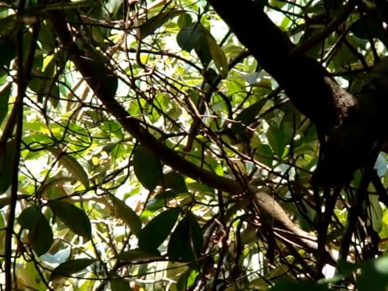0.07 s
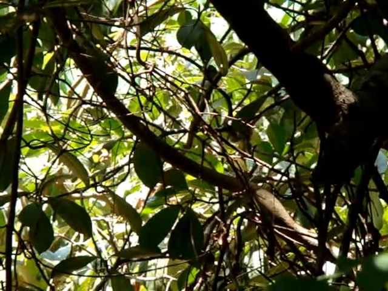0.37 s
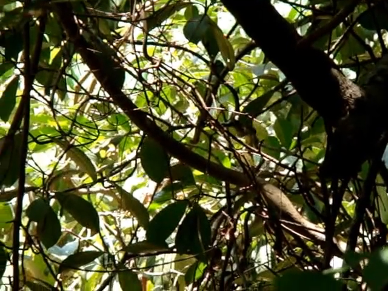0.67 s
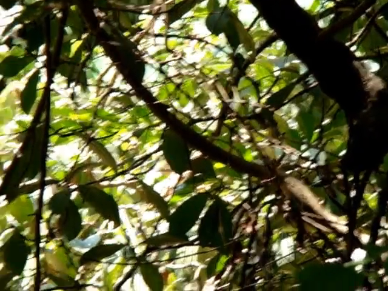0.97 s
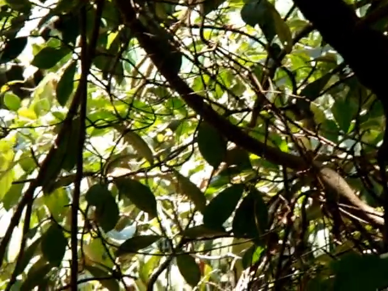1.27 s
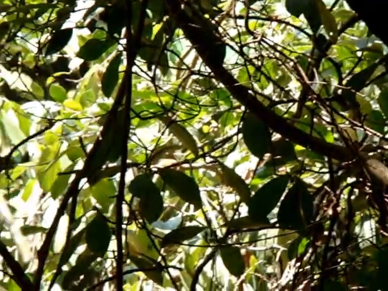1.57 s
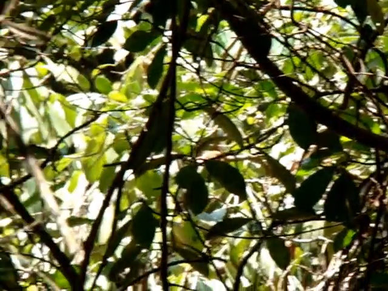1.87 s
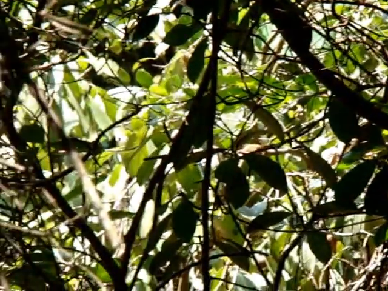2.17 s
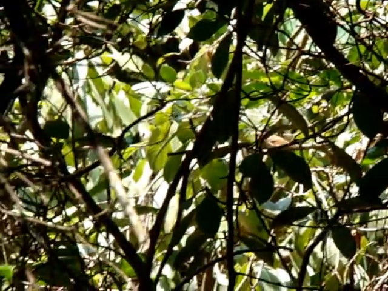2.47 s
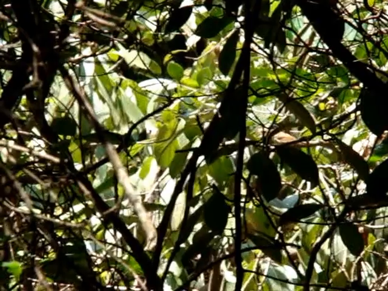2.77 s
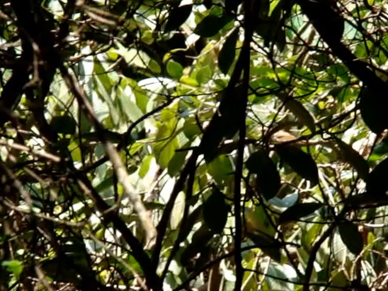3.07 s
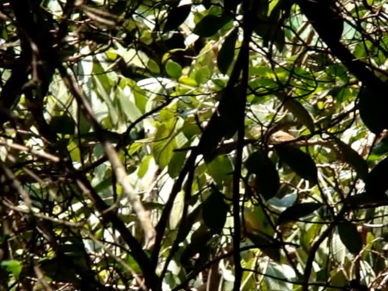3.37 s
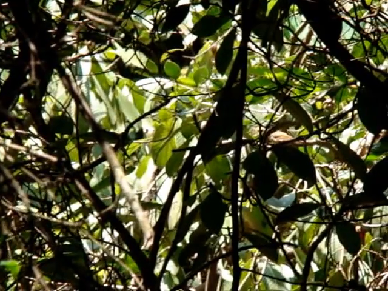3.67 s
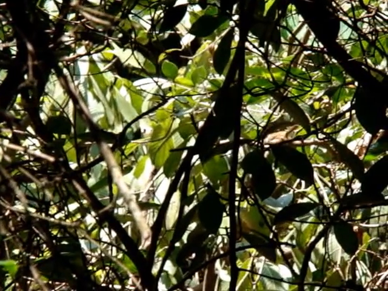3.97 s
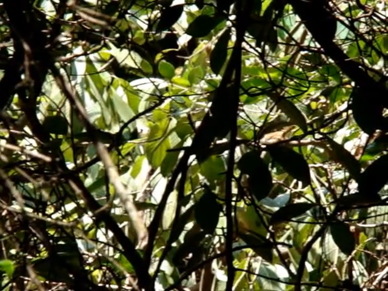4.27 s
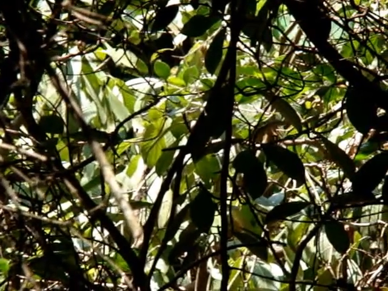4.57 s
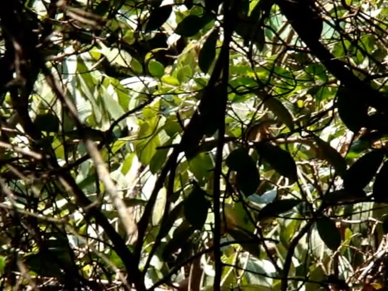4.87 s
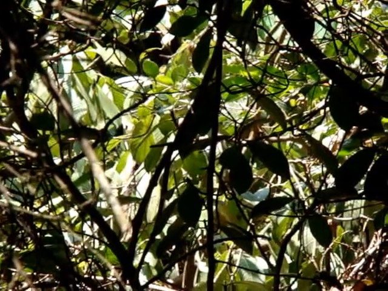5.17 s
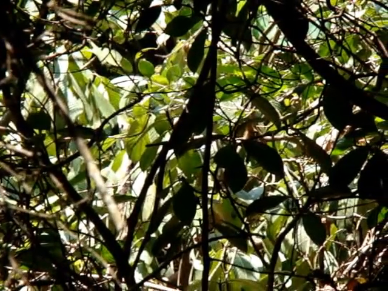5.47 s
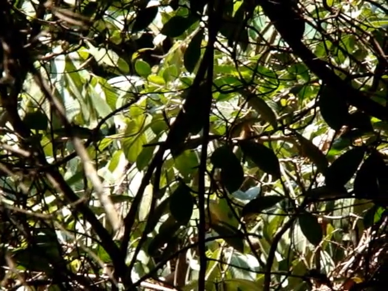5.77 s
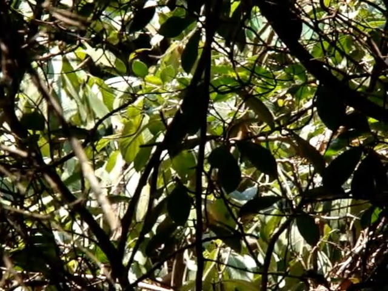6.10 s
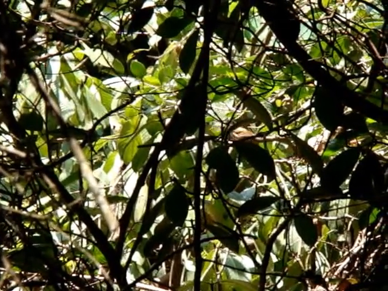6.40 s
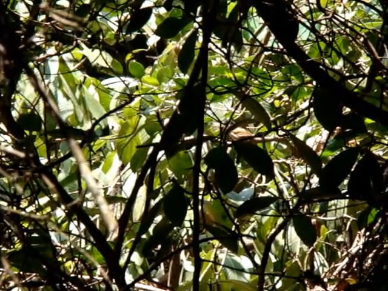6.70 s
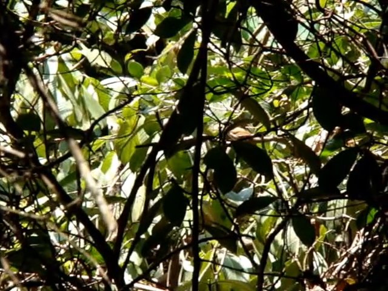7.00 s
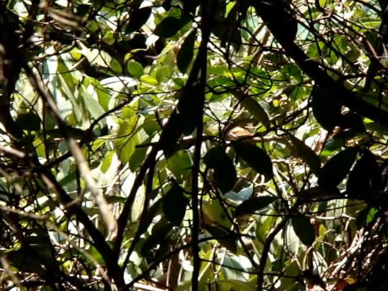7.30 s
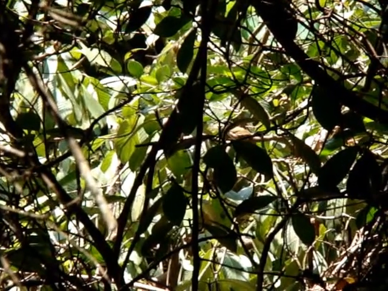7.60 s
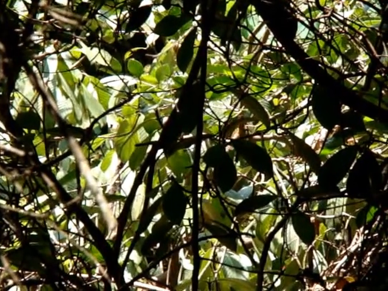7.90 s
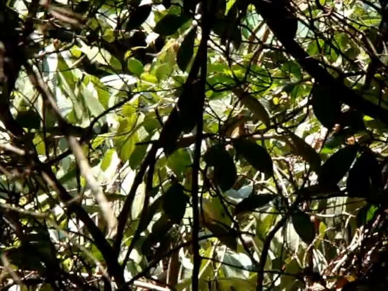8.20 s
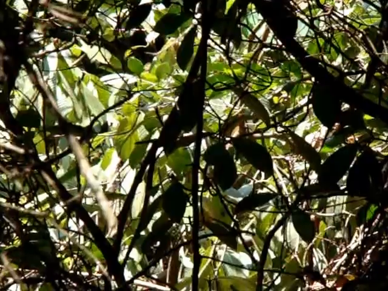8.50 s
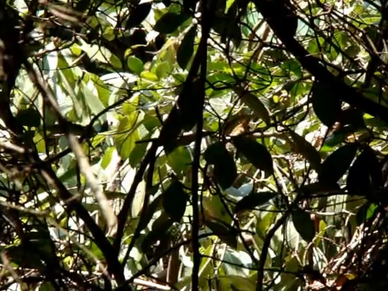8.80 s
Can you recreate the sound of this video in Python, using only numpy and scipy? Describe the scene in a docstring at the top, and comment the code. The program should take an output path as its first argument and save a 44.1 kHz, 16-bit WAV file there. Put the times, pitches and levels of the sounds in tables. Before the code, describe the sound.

A soft, low forest hush and a fine canopy hiss run for about nine seconds. A hidden bird, the loudest sound, calls three times, at about 1.1, 3.6 and 6.9 seconds. Each call has two very short, high notes a third of a second apart: a husky falling whistle, then a buzzy falling rasp. Both end in a tiny chuck and echo among the trunks for nearly a second. A distant cicada drones from the start, fading until it stops around 4.5 seconds. A thin, shrill insect whine comes and goes, roughly a second on and a second off. At about 7 seconds a nearer cicada starts a dense, high hiss, easing slightly near 8 seconds and continuing to the end. Faint leaf rustles, small twig snaps and light wooden ticks are scattered throughout, with a clearer tap and snap around 3 seconds.

```python
"""A babbler hidden in dense woodland calls three times: a husky falling whistle, then a buzzy falling
rasp, both roughened by its fluttering syrinx and closed by a short chuck. Foliage scatters each note
and the trunks hold a long echo. A far cicada drones and fades, a thin insect whines on and off, and a
near cicada's tymbals start up at the third call. Leaves rustle, twigs snap and wood ticks and knocks
over a bed of low forest hush and canopy hiss."""
import sys
import numpy as np
from scipy import signal
from scipy.fft import rfft, irfft, next_fast_len
from scipy.io import wavfile
from scipy.ndimage import uniform_filter1d, map_coordinates

SR = 44100
rng = np.random.default_rng(int(sys.argv[2]) if len(sys.argv) > 2 else 0)


def put_to_file(sound):
    """Save the sound as 16-bit audio at rate SR, in the file named by the first command-line argument."""
    columns = np.atleast_2d(sound).T  # one column per channel
    safe = np.clip(columns, -1, 1)
    whole_steps = np.round(safe * 32767)
    wavfile.write(sys.argv[1], SR, whole_steps.astype(np.int16))


N = 390285

# Tone of the low forest hush. Each row: frequency in Hz, relative level in dB.
HUSH_EQ = [(15, -58), (25, -25), (91, -21.5), (171, -12.5), (300, -5.5), (380, -4.5), (485, -4.5),
           (679, -4), (741, -5.5), (885, -1.5), (1240, -1.1), (1350, -2.5), (1460, -1), (1560, -7.5),
           (1750, -9), (2300, -30)]
# Fader ride on the hush. Each row: time in seconds, level in dB.
HUSH_RIDE = [(0, -53.5), (1.2, -52.5), (2.5, -52.5), (3.4, -53), (4.1, -52.5), (5.1, -52), (6.4, -53.5),
             (7.3, -53), (8.85, -52.5)]
# Tone of the canopy's leaves and far insects. Each row: frequency in Hz, relative level in dB.
CANOPY_EQ = [(1300, -35.5), (1600, -14.5), (1900, -4), (2400, -0.5), (3400, -0.5), (4800, 0.7), (5700, 2),
             (6100, 0.5), (6350, 6), (6600, 0), (7200, 0.5), (7700, -6), (8600, -5.5), (10200, -9)]
# Fader ride on the canopy. Each row: time in seconds, level in dB.
CANOPY_RIDE = [(0, -47.5), (2.5, -47.5), (4, -47.2), (4.9, -47.5), (5.6, -47), (6.4, -48), (8.85, -46.5)]
# Swells on top of a faint, distant hum. Each row: start in seconds, end in seconds, level in dB.
HUM_RISES = [(1.1, 2.5, -72.5), (4.6, 5.9, -70), (6.554, 7.146, -67)]
# Body of the far cicada. Each row: frequency in Hz, relative level in dB.
FAR_CICADA_EQ = [(4500, -38), (5300, -13.5), (5700, -3), (6000, -2), (6400, -5), (7000, 4), (7350, 0.5),
                 (7700, -11.5), (8300, -30)]
# Bouts of the whining insect. Each row: start and end in seconds, gain in dB, fade in seconds.
WHINE_BOUTS = [(-.2, 1.047, -56, .1), (2.05, 3.252, -56, 0.17), (4.22, 5.363, -54.5, 0.1),
               (6.68, 7.704, -49.5, 0.61)]
# The whine's shrill band. Each row: frequency in Hz, relative level in dB.
WHINE_EQ = [(5500, -38), (6150, -4), (6330, -5), (6500, -21), (6670, 7.5), (6840, 1.5), (6950, -12),
            (7150, -16), (7700, -37)]
# Leaf rustles. Each row: start in seconds, gain in dB, length in seconds, leaf resonance in Hz.
LEAF_RUSTLES = [(0.282, -48, 0.017, 3420), (0.418, -49, 0.02, 3000), (0.645, -54, 0.071, 2400),
                (1.32, -57, 0.021, 4200), (2.03, -51.5, 0.05, 3000), (2.199, -52, 0.046, 3400),
                (2.298, -51.5, 0.051, 2280), (2.892, -56.5, 0.052, 3000), (4.39, -59, 0.055, 3900),
                (4.758, -56, 0.038, 3400), (4.85, -59, .06, 3900), (5.343, -57, 0.052, 2600),
                (5.667, -53, 0.024, 2100), (7.772, -53, 0.06, 2240), (7.865, -51, 0.033, 2360),
                (8.24, -53.5, 0.045, 2300)]
# Tone of the echo off the trunks. Each row: frequency in Hz, gain in dB.
TRUNK_EQ = [(200, -6), (2600, -7), (3050, -2), (3450, 1.5), (3700, -3), (4100, 1), (5000, 0), (11000, 1.5)]
# Small twigs breaking. Each row: start in seconds, relative level in dB, pitch in Hz.
TWIG_SNAPS = [(.285, -39, 3400), (1.327, -35, 4500), (2.113, -33, 3080), (2.333, -40, 3800),
              (2.438, -34.5, 2660), (2.895, -35, 3470), (3.059, -32, 4900), (4.39, -37, 3800),
              (4.744, -39, 3450), (5.978, -37.5, 3000), (6.152, -33.5, 2320), (6.625, -37, 2310)]
# Dry ticks and soft knocks of wood. Each row: start in seconds, relative level in dB, pitch in Hz.
WOOD_TAPS = [(1.074, -52, 404), (1.253, -41.5, 1065), (1.278, -44, 1100), (1.332, -45, 745),
             (1.8, -44, 1110), (1.832, -47, 706), (2.246, -53, 363), (2.335, -45, 765), (2.607, -44.5, 960),
             (2.655, -42, 1060), (3.043, -32.5, 1270), (3.085, -50.5, 410), (4.016, -41.5, 1090),
             (4.839, -41.5, 1210), (5.247, -41, 1090), (5.386, -43, 1180), (5.752, -52, 353),
             (6.012, -48, 480), (6.294, -40, 1290), (6.345, -47, 1190), (6.942, -39, 1340),
             (7.030, -50, 358), (8.117, -38, 1400), (8.546, -44.5, 1000), (8.795, -42, 1200)]
# Each call's first note. Each row: start and length in seconds, pitch before the release in Hz,
# easing of the slide from 0 to 1, peak gain in dB, attack in seconds, sag after the peak in dB,
# chuck gain in dB, echo send in dB.
WHISTLE_NOTES = [(1.123, 0.085, 3134, 0.06, -27.5, 0.077, 6, -38.5, -3),
                 (3.574, 0.072, 3096, 0.13, -29, 0.045, 3.5, -36.5, -2),
                 (6.911, .082, 3217, .7, -31, 0.034, 4.5, -49, -0.5)]
# Each call's second note. Each row: start and length in seconds, opening pitch and pitch before the
# release in Hz, rasp gain in dB, attack in seconds, slur gain in dB, slur buzz from 0 to 1,
# chuck gain in dB, pitch that lingers in the echo in Hz, gain of that ring in dB.
RASP_NOTES = [(1.428, 0.11, 4440, 3676, -31.5, 0.029, -28.5, 0.43, -39.5, 3900, -5),
              (3.907, .097, 4410, 3790, -29.5, 0.05, -27, .55, -38.5, 4100, 1),
              (7.23, .124, 4560, 3790, -30.5, .028, -30, 0.32, -46.5, 3790, 0.5)]
# The bird's throat and open beak. Each row: frequency in Hz, gain in dB.
BEAK_EQ = [(1500, -8), (2700, -6.5), (3300, -1), (4050, -2), (4450, -6.5), (4800, -7), (5400, -3.5),
           (7000, 1.5), (10000, 5)]
# Body of the near cicada. Each row: frequency in Hz, relative level in dB.
NEAR_CICADA_EQ = [(3000, -36), (3800, -9), (4000, -4.5), (4500, -2.5), (4750, -6), (5500, -3.5),
                  (6300, -1.5), (6850, 0), (7350, -1.5), (7700, -9), (8500, -14.5), (9200, -10),
                  (10200, -20)]

RELEASE_DROP = 0.1014  # share of its pitch that a note loses as it closes


def amp(db):
    """Decibels to gain."""
    return 10 ** (np.asarray(db) / 20)


def unit(x):
    """Scale to rms 1."""
    return x / np.sqrt(np.mean(x ** 2) + 1e-20)


def clock():
    """The time of each sample in seconds."""
    return np.arange(N) / SR


def ride(rows):
    """A fader move through (seconds, dB) points, in dB per sample."""
    return np.interp(clock(), *np.transpose(rows))


def ramp(start, length):
    """0 before start, rising evenly to 1 over length."""
    return np.clip((clock() - start) / length, 0, 1)


def gate(start, end, fade):
    """Open between start and end, with sloping edges."""
    return np.clip(np.minimum(clock() - start, end - clock()) / fade + .5, 0, 1)


def wobble(rate):
    """A smooth random modulator at rms 1, with rate knots a second."""
    knots = rng.standard_normal(int(N * rate / SR) + 4)
    return unit(map_coordinates(knots, [clock() * rate]))


def filtered(x, response):
    """Filter x by a gain that is a function of frequency."""
    size = next_fast_len(N + 8192)
    return irfft(rfft(x, size) * response(np.fft.rfftfreq(size, 1 / SR)), size)[..., :N]


def eq(x, curve):
    """Run x through a (Hz, dB) curve, cutting everything beyond its ends."""
    points_hz, db = np.transpose(curve)
    return filtered(x, lambda hz: amp(np.interp(np.log(hz + 1), np.log(points_hz), db, -120, -120)))


def coloured(x, curve):
    """EQ x and bring it to rms 1."""
    return unit(eq(x, curve))


def patchy_noise(depth_db):
    """White noise whose level varies in small patches of time and frequency."""
    bins = signal.stft(rng.standard_normal(N), nperseg=512)[2]
    patches = uniform_filter1d(rng.standard_normal(bins.shape), size=5, axis=0)
    patches = uniform_filter1d(patches, size=9, axis=1)
    return signal.istft(bins * amp(depth_db * unit(patches)), nperseg=512)[1][:N]


def narrow_band(hz, width_hz):
    """A tone of wandering strength and phase: a narrow band of noise at rms 1."""
    phase = 2 * np.pi * np.cumsum(hz * np.ones(N)) / SR
    return unit(wobble(width_hz) * np.sin(phase) + wobble(width_hz) * np.cos(phase))


def resonate(x, hz, width_hz):
    """Ring a single resonance with x."""
    return signal.lfilter(*signal.iirpeak(hz, hz / width_hz, fs=SR), x)


def woods(x, leaves_db, trunks_db, leaves_t60=0.18, trunks_t60=0.98, ring_hz=None, ring_db=0):
    """Dry sound, a quick scatter off foliage and a long echo off trunks, which may favour one pitch."""
    t = np.arange(SR) / SR
    leaves = unit(rng.standard_normal(SR) * amp(-60 * t / leaves_t60))
    tail = amp(-60 * t / trunks_t60) * (1 - np.exp(-t / 0.03))
    trunks = eq(unit(rng.standard_normal(SR) * tail), TRUNK_EQ)[:SR]
    if ring_hz:
        trunks += amp(ring_db) * resonate(unit(rng.standard_normal(SR) * tail), ring_hz, width_hz=60)
    impulse = (amp(leaves_db) * leaves + amp(trunks_db) * trunks) / np.sqrt(SR)
    return x + signal.fftconvolve(x, impulse)[:N]


def forest_air():
    """The bed: a low hush with a faint hum in it, and the finer hiss of the canopy."""
    hush = amp(ride(HUSH_RIDE) + 0.5 * wobble(12)) * coloured(patchy_noise(depth_db=1.7), HUSH_EQ)
    swells = sum(amp(db) * gate(start, end, fade=0.24) for start, end, db in HUM_RISES)
    hum = (amp(-76.5) + swells) * narrow_band(355, width_hz=45)
    canopy = amp(ride(CANOPY_RIDE)) * coloured(patchy_noise(depth_db=1.3), CANOPY_EQ)
    return hush + hum + canopy


def far_cicada(fade_db_per_s=1, sink_hz_per_s=48, stop_s=4.5):
    """A distant drone that fades and stops; its low resonance sinks and dies a little faster."""
    t = clock()
    level = amp(-51 - fade_db_per_s * t) * (1 - ramp(stop_s, length=.1))
    ring_hz = 4500 - sink_hz_per_s * t + 15 * wobble(200)
    ring = amp(-4 - 0.4 * t) * narrow_band(ring_hz, width_hz=165)
    hiss = coloured(patchy_noise(depth_db=1.3), FAR_CICADA_EQ)
    return level * (hiss + ring)


def whining_insect():
    """A thin, shrill band with a wavering tone in it, about a second on and a second off."""
    bouts = sum(amp(db) * gate(start, end, fade) for start, end, db, fade in WHINE_BOUTS)
    tone = narrow_band(6720 + 57.3 * wobble(14), width_hz=42)
    hiss = coloured(patchy_noise(depth_db=3.0), WHINE_EQ)
    return bouts * (hiss + amp(-2.5) * tone)


def leaf_rustles(stir_db=-60, ring_db=-6):
    """Leaves brush in soft clumps of crackle, each ringing one leaf, with faint stirring in between."""
    crackle = rng.standard_normal(N) * np.abs(wobble(500))
    leaf_eq = [(300, -24), (700, -10.5), (1800, -5), (2400, 1.5), (3400, 3), (5000, -9), (10200, -5.5)]
    brush = coloured(crackle, leaf_eq)
    dry = amp(stir_db + 2.5 * wobble(22)) * brush
    for start, db, length, hz in LEAF_RUSTLES:
        ring = unit(resonate(brush, hz, width_hz=300))
        dry += amp(db) * gate(start, start + length, fade=0.02) * (brush + amp(ring_db) * ring)
    return woods(dry, leaves_db=-8.0, trunks_db=-9.0)


def twig_snaps(trim_db=-5, t60=0.0094):
    """Each twig gives way with a bright crack of a few milliseconds."""
    dry, t = np.zeros(N), np.arange(SR // 40) / SR
    for start, db, hz in TWIG_SNAPS:
        crack = np.sin(2 * np.pi * hz * t) + .5 * rng.standard_normal(len(t))
        dry[round(start * SR):][:len(t)] += amp(db + trim_db) * crack * amp(-60 * t / t60)
    bright = eq(dry, [(200, -13.0), (2000, 4.0), (11000, 8.0)])
    return woods(bright, leaves_db=-1.0, trunks_db=-7.0)


def wood_taps(rise_cycles=1.53, decay_cycles=16.3, click_t60=.012):
    """Hollow taps of wood, each with a dry contact click and a weaker rebound."""
    dry, t = np.zeros(N + SR), np.arange(SR // 20) / SR
    for start, db, hz in WOOD_TAPS:
        cycles = hz * t  # the envelope runs in cycles, so low knocks rise and ring for longer
        envelope = amp(-60 * cycles / decay_cycles) * (1 - np.exp(-(cycles / rise_cycles) ** 2))
        body = amp(db + 12) * np.sin(2 * np.pi * cycles) * envelope
        click = amp(db - 16 - 60 * t / click_t60) * rng.standard_normal(len(t))
        tap = body + click
        dry[round(start * SR):][:len(t)] += tap
        dry[round((start + .005) * SR):][:len(t)] += amp(-7.5) * tap
    return woods(dry[:N], leaves_db=-5.5, trunks_db=-14.5)


def syrinx(start, end, hz, db, buzz, release_s, flutter_hz, swing, rough):
    """One gliding tone, spread into a hissy buzz by a fast, uneven flutter of the syrinx."""
    closing = ramp(end, release_s)  # pitch and level collapse and the voice roughens
    hz = hz * (1 - RELEASE_DROP * closing)
    db = db - 6 * closing ** 1.17
    buzz = buzz + 0.8 * closing
    flutter = np.sin(2 * np.pi * np.cumsum(flutter_hz * (1 + 0.18 * wobble(150))) / SR)
    pitch = hz * (1 + buzz * (swing * flutter + rough * wobble(900)) + 0.0041 * wobble(120))
    phase = 2 * np.pi * np.cumsum(pitch) / SR
    tone = np.sin(phase) + amp(-29) * np.sin(2 * phase) + amp(-37) * np.sin(3 * phase)
    hiss = amp(-25.5) * buzz * rng.standard_normal(N)
    envelope = amp(db) * (1 + 0.1 * buzz * flutter) * gate(start, end + release_s, fade=0.0031)
    return np.sqrt(2) * (tone + hiss) * envelope


def whistle(start, length, final_hz, ease, db, attack, sag_db, chuck_db, first_hz=3604, swell_db=18):
    """A husky tone that swells to a peak and eases while its pitch slides down, then ends in a chuck."""
    end, slide = start + length, ramp(start, length)
    pitch = first_hz + (final_hz - first_hz) * slide * (1 + ease * (1 - slide))
    level = db - swell_db * (1 - ramp(start, attack)) ** 1.53 - sag_db * ramp(start + attack, 0.018)
    voice = syrinx(start, end, pitch, level, buzz=.25,
                   release_s=0.011, flutter_hz=170, swing=.11, rough=.02)
    return voice + chuck(end, final_hz, chuck_db)


def chuck(start, hz, db, length=0.026, rate_hz=140, low_hz=2616, fade_db=7):
    """The syrinx shuts in a few quick flicks, each diving from hz to low_hz."""
    t = np.arange(int(length * SR)) / SR
    dive = (t * rate_hz * (1 + 0.085 * rng.standard_normal())) % 1
    phase = 2 * np.pi * np.cumsum(hz + (low_hz - hz) * dive) / SR
    flicks = 2 * np.sin(phase) * np.abs(np.sin(np.pi * dive)) ** .5
    envelope = amp(db - fade_db * t / length) * signal.windows.tukey(len(t), .1)
    return np.interp(clock(), round(start * SR) / SR + t, flicks * envelope, left=0, right=0)


def rasp(start, length, first_hz, final_hz, rasp_db, attack, slur_db, slur_buzz, chuck_db):
    """A wide buzz swells and catches, then breaks into a clearer falling slur that ends in a chuck."""
    rasp_s, clear_s, rasp_buzz = .076, 0.0017, 0.92
    break_hz, slur_hz = 4188, 3980  # the pitch steps down as the rasp clears
    end = start + length
    cleared = ramp(start + rasp_s - clear_s, clear_s)
    slur = ramp(start + rasp_s, length - rasp_s)
    pitch = first_hz + (break_hz - first_hz) * ramp(start, rasp_s)
    pitch += (slur_hz - break_hz) * cleared + (final_hz - slur_hz) * slur
    sag_db = 7.5 * ramp(start + attack, rasp_s - attack) ** 2
    swell_db = rasp_db - 6.5 * (1 - ramp(start, attack)) - sag_db
    level = swell_db * (1 - cleared) + (slur_db - 6 * slur) * cleared
    buzz = rasp_buzz + (slur_buzz - rasp_buzz) * cleared
    voice = syrinx(start, end, pitch, level, buzz,
                   release_s=.018, flutter_hz=300, swing=.114, rough=.024)
    return voice + chuck(end, final_hz * (1 - RELEASE_DROP), chuck_db)


def babbler():
    """Whistles and rasps leave the beak and scatter, each along its own paths through the wood."""
    calls = np.zeros(N)
    for *note, echo_db in WHISTLE_NOTES:
        calls += woods(whistle(*note), leaves_db=0.5, trunks_db=echo_db,
                       leaves_t60=0.28, trunks_t60=0.94)
    for *note, ring_hz, ring_db in RASP_NOTES:
        calls += woods(rasp(*note), leaves_db=-4.0, trunks_db=-1.5,
                       leaves_t60=0.34, trunks_t60=0.87, ring_hz=ring_hz, ring_db=ring_db)
    return eq(calls, BEAK_EQ)


def near_cicada(start_s=6.945, ease_off_s=7.72, sag_db=2.5):
    """Dense tymbal clicks ring the insect's body and blur into a hiss with a thin ring in it."""
    clicks = patchy_noise(depth_db=1) * amp(1.14 * wobble(400) + 0.18 * wobble(11))
    body = coloured(clicks, NEAR_CICADA_EQ) + amp(-14) * narrow_band(4220, width_hz=40)
    easing = 1 - np.exp(-np.maximum(clock() - ease_off_s, 0) / 0.28)
    return ramp(start_s, length=0.086) * amp(-38 - sag_db * easing) * body


def scene():
    """Bird, insects and forest in one mono mix, the same on both channels."""
    insects = near_cicada() + far_cicada() + whining_insect()
    forest = wood_taps() + twig_snaps() + leaf_rustles() + forest_air()
    mono = babbler() + insects + forest
    return np.array([mono, mono])


def record(dry, cutoff_hz=10100):
    """A steep low-pass takes the very top off the mix."""
    return filtered(dry, lambda hz: np.clip((cutoff_hz - hz) / 100 + .5, 0, 1))


dry = scene()
out = record(dry)
put_to_file(out)
```